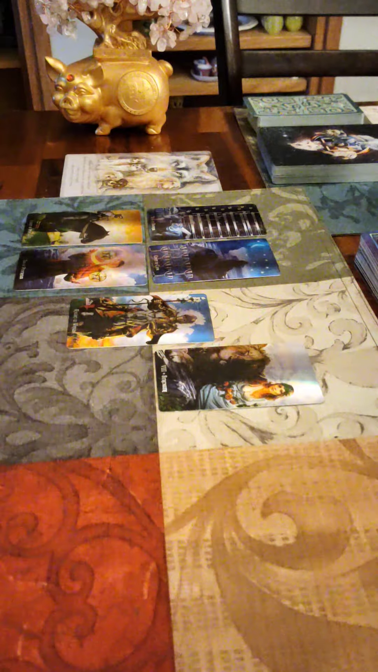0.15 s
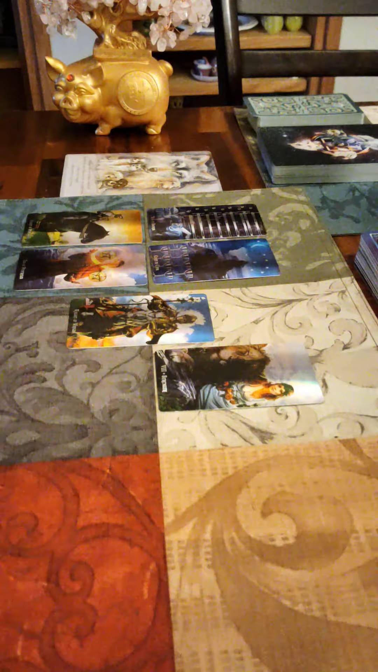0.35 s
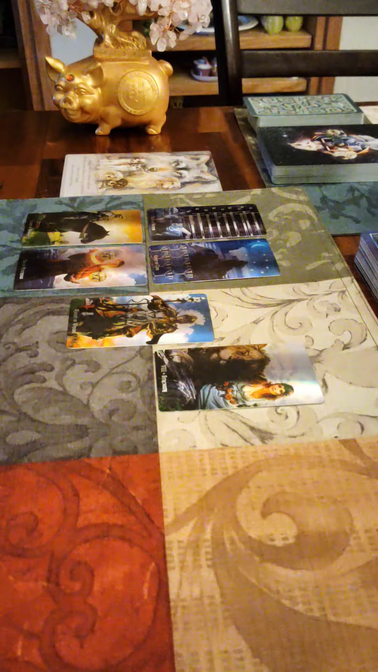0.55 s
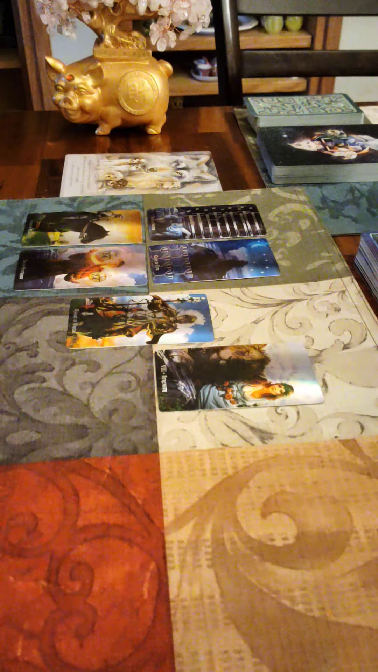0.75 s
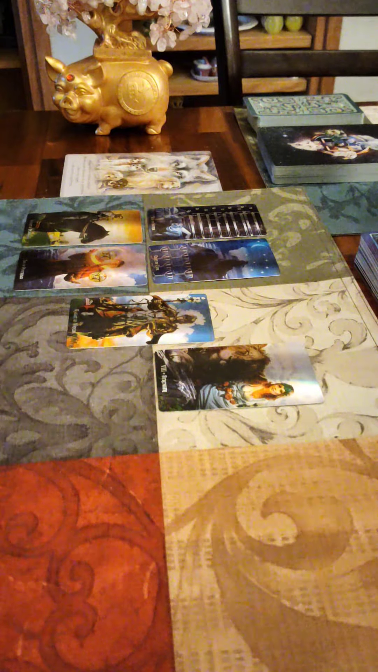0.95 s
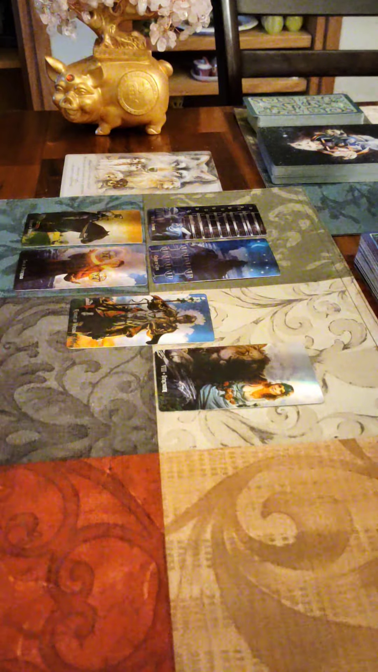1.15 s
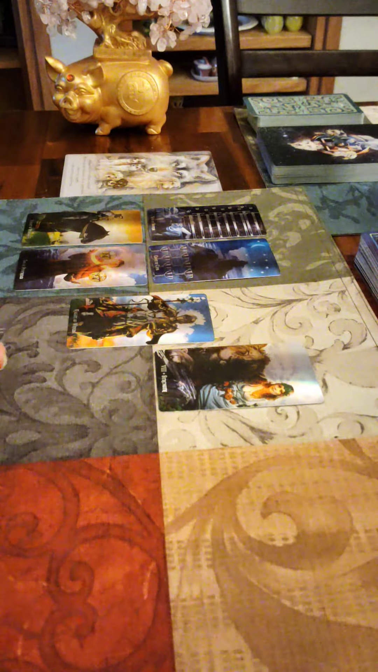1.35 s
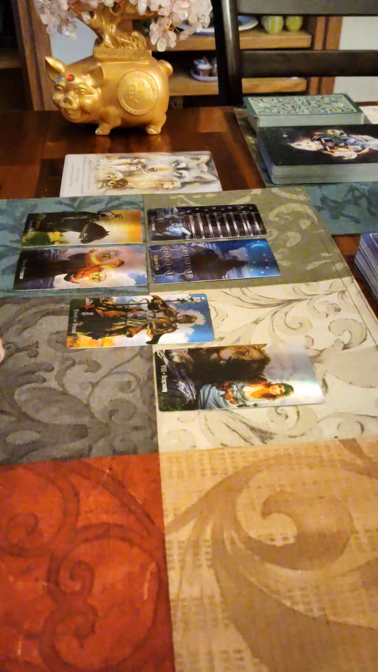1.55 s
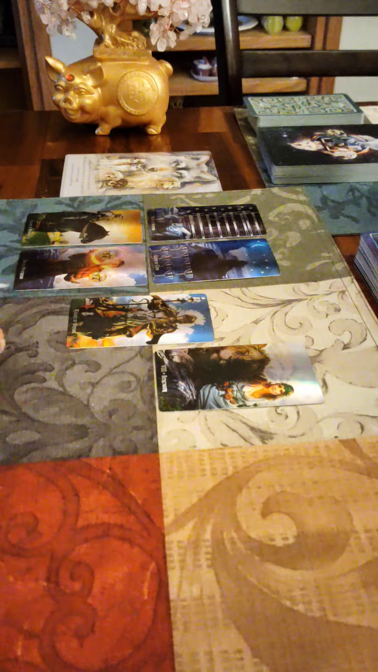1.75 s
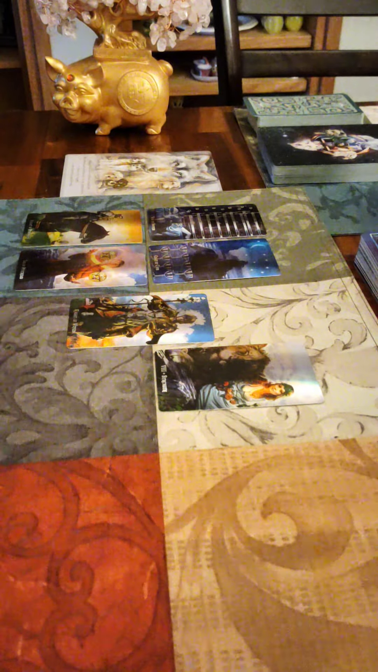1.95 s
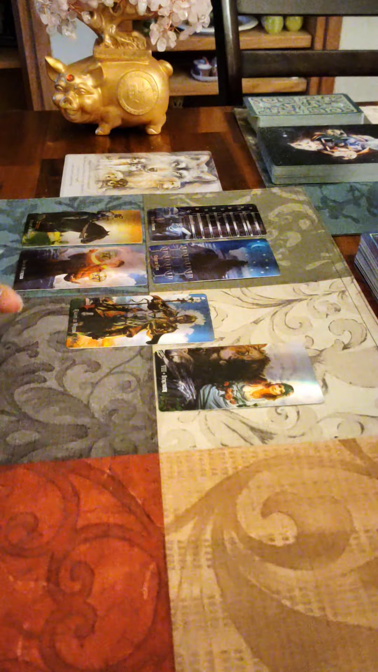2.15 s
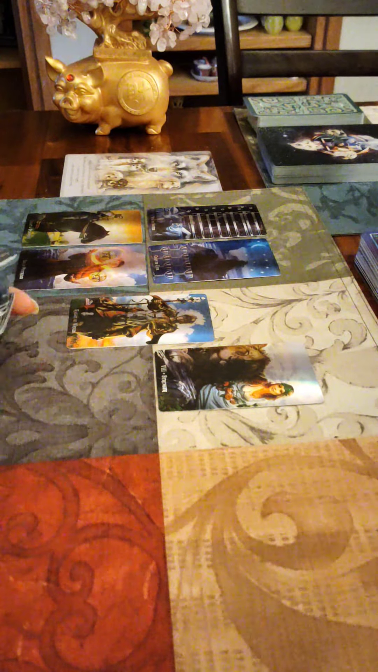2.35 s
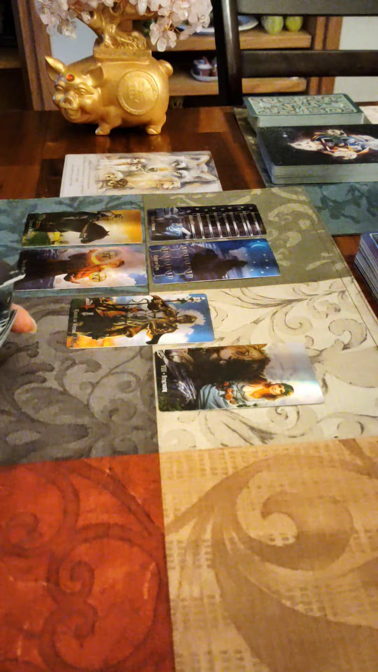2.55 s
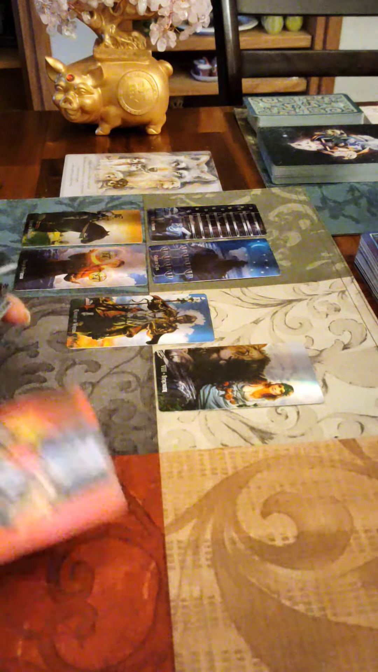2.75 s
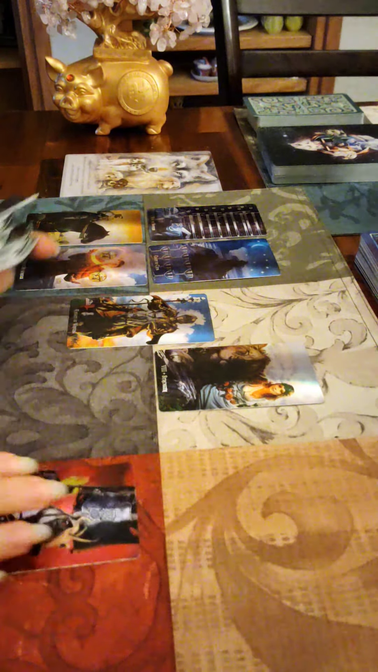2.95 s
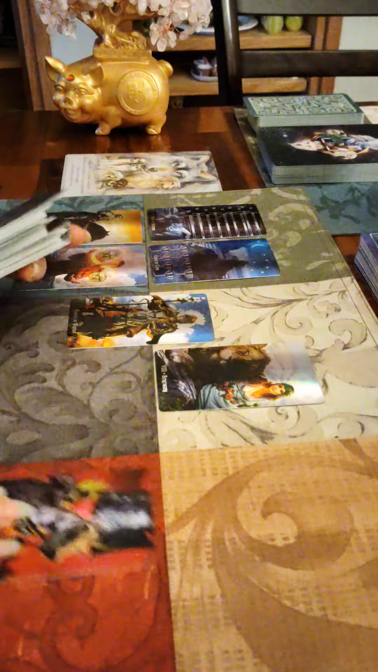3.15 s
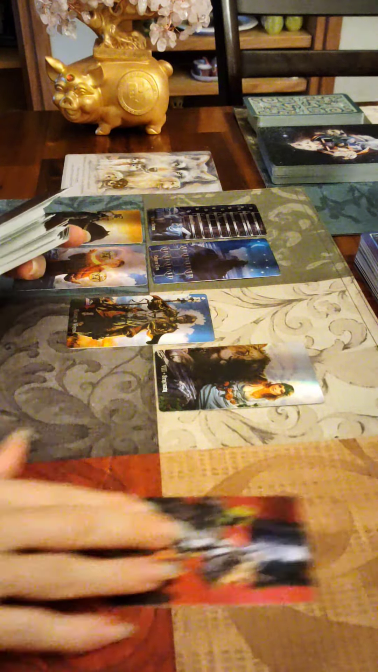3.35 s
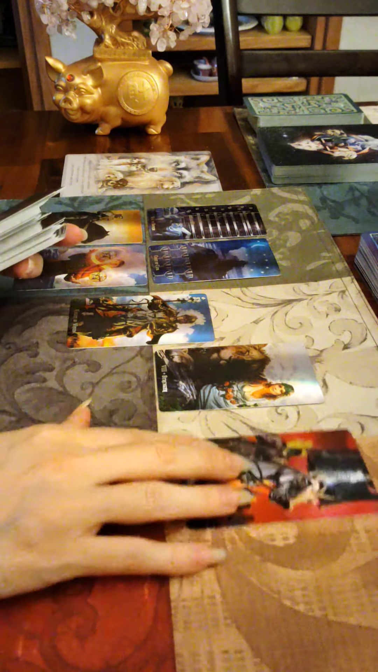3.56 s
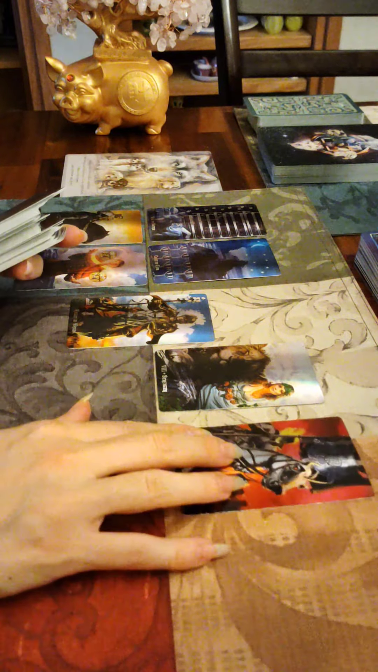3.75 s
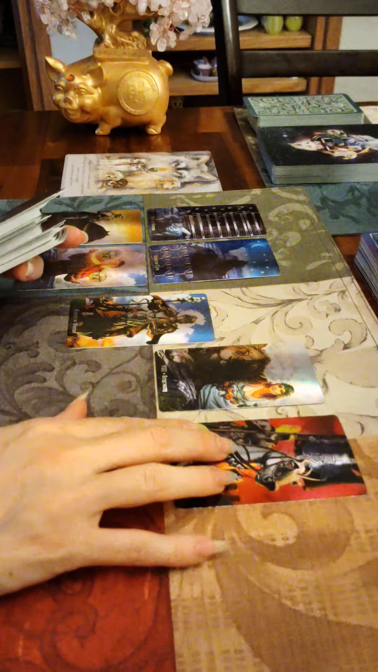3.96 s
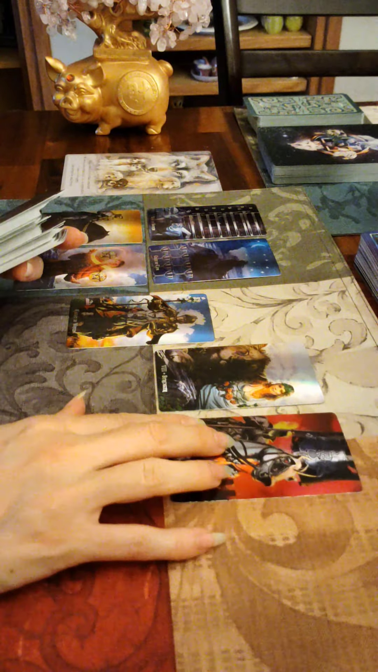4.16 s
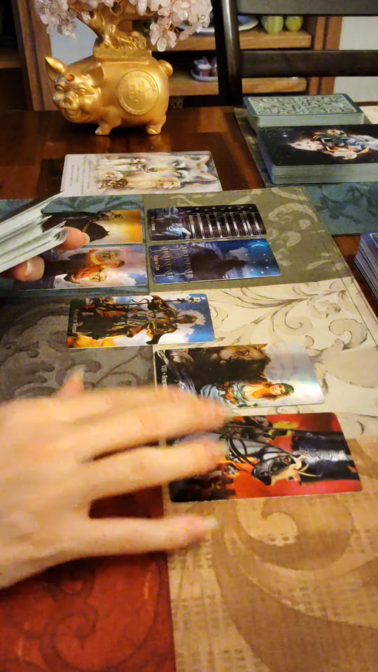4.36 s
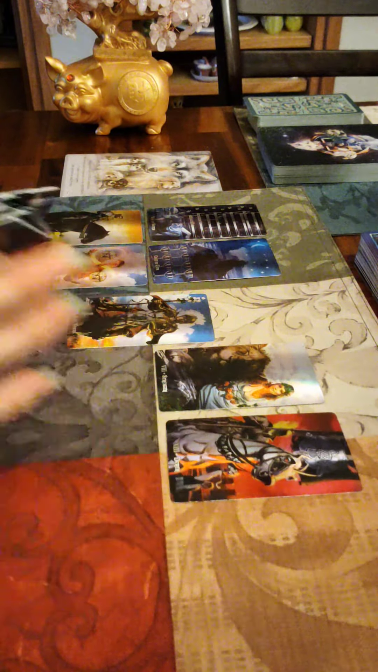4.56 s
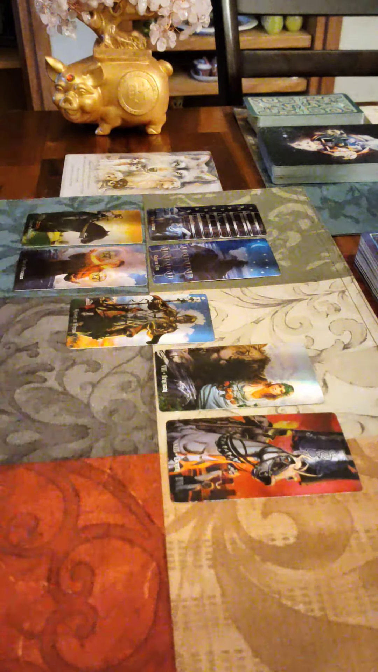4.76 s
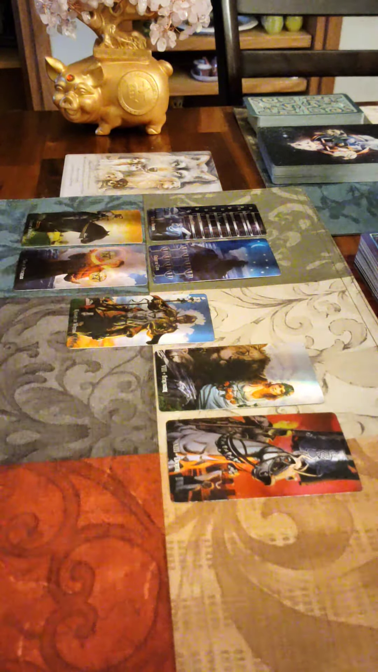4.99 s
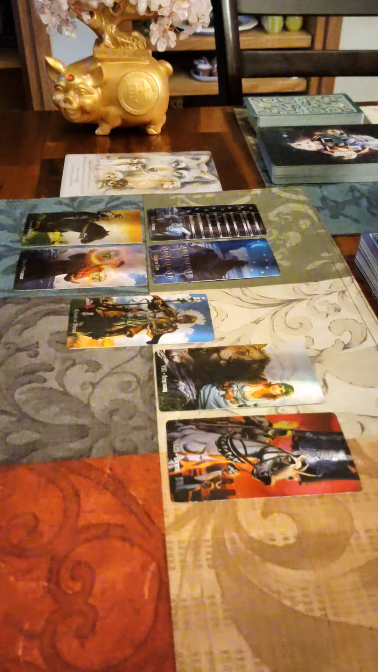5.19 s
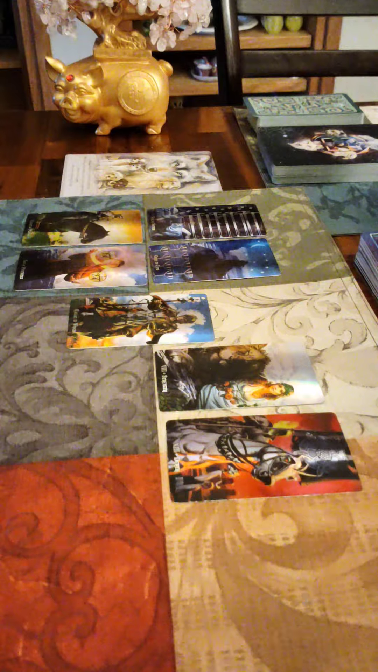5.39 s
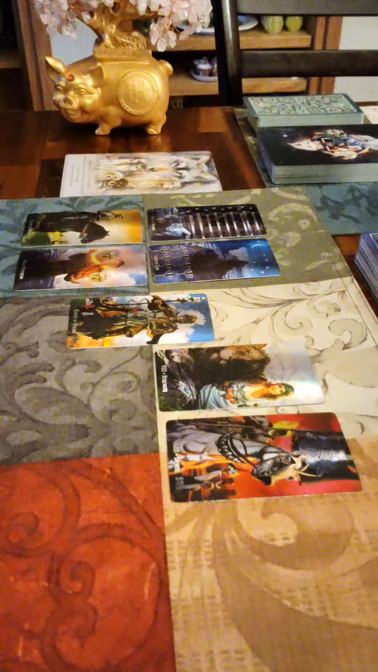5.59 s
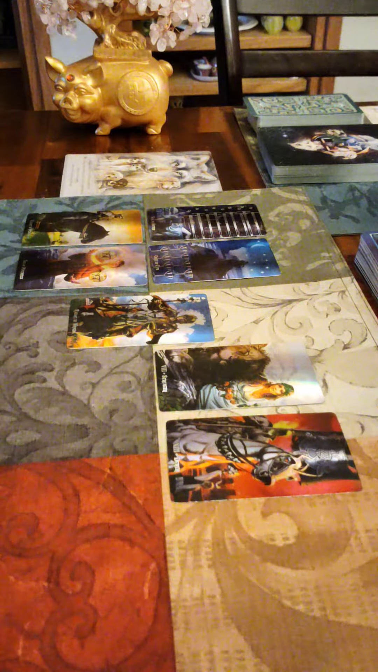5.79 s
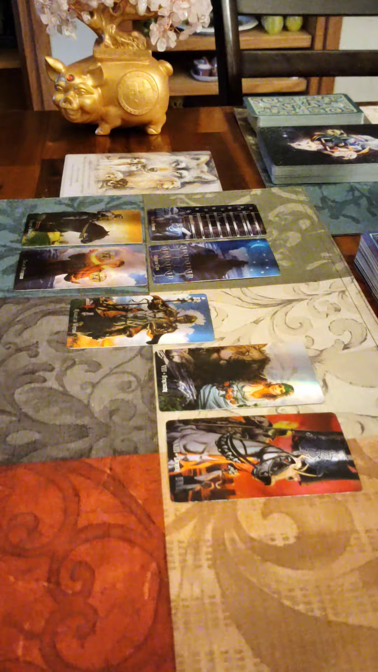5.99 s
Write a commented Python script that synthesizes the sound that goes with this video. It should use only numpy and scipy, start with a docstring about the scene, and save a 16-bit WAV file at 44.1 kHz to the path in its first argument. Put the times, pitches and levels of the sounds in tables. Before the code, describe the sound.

A faint low room hum stays underneath while cards are handled near a phone microphone. Gentle papery rubbing gives way to small irregular clicks and light taps, then a stronger peel, a bright cluster of snaps with a soft hand thud on the table, and a dry slide across cloth. Afterwards only quiet scuffs and a few ticks remain until a closing crisp flick. The small room adds a short diffuse tail.

```python
"""A soft rub of card over a low room hum comes first; then cards are peeled, flicked and slid over a table cloth.
Rubs are grainy noise through three bands of card resonances; edges snap as short decaying noise that rings them.
Dull knocks and thuds ring the table top, a small room answers with a short diffuse tail, and a faint rustle
and slowly swelling drones stay underneath. A phone close by dulls the extreme top; both channels are the same."""
import sys
import numpy as np
from scipy import signal
from scipy.fft import rfft, irfft
from scipy.io import wavfile
from scipy.ndimage import uniform_filter1d

SR = 44100
rng = np.random.default_rng(int(sys.argv[2]) if len(sys.argv) > 2 else 0)


def int16_out(signal):
    """Quantize to a 16-bit WAV file."""
    q = np.round(np.clip(np.atleast_2d(signal).T, -1, 1) * 32767)
    wavfile.write(sys.argv[1], SR, q.astype(np.int16))


N = 265923  # samples, about 6 s


def undb(db):
    """Turn decibels into an amplitude factor."""
    return 10 ** (np.asarray(db) / 20)


def unit(x):
    """Scale to an RMS of 1."""
    return x / np.sqrt(np.mean(x ** 2))


def above(x, hz):
    """Steep high-pass."""
    return signal.sosfilt(signal.butter(6, hz, "high", fs=SR, output="sos"), x)


def resonate(x, modes):
    """Sum of parallel resonances, each (frequency [Hz], width [Hz], weight [dB])."""
    out = 0
    for hz, width, db in modes:
        out = out + undb(db) * signal.lfilter(*signal.iirpeak(hz, hz / width, fs=SR), x)
    return out


def ring(x, modes):
    """Resonances scaled so that white noise keeps its level."""
    answer = resonate(signal.unit_impulse(4096), modes)
    return resonate(x, modes) / np.sqrt(np.sum(answer ** 2))


def near(modes, hz, fall_db):
    """The spot that is struck favours the modes close to hz: fall_db less for each octave away."""
    return [(f, width, db - fall_db * abs(np.log2(f / hz))) for f, width, db in modes]


def flicker(rate):
    """Random levels, one every 1 / rate s, joined by straight slides; RMS of 1."""
    hold = int(SR / rate)
    steps = np.repeat(rng.standard_normal(N // hold + 1), hold)
    return unit(uniform_filter1d(steps, hold)[:N])


def bursts(rows, decay_s, push_s, size):
    """For each (s, peak dB, modes) a decaying spit of noise, softened over the push time, rings the modes."""
    out = np.zeros(N + size)
    decay = np.exp(-np.arange(size) / SR / decay_s)
    push = np.hanning(3 + int(push_s * SR))
    for s, db, modes in rows:
        spit = rng.standard_normal(size) * decay
        blow = resonate(np.convolve(spit, push)[:size], modes)
        start = int(s * SR)
        out[start:start + size] += undb(db) * blow / np.abs(blow).max()
    return out[:N]


def card(hiss, body, low):
    """Sum a card's three bands, keeping the upper two silent below their floors."""
    return above(hiss, 4500) + above(body, 3000) + low


# colour of the room noise: (frequency [Hz], relative level [dB])
HUM_COLOUR = [(10, -8), (22, 5), (89, -6), (190, -16.5), (387, -12.5), (693, -21), (790, -17.5),
              (1300, -22), (2590, -27.5), (4600, -25), (6500, -18.5), (7600, -27.5), (8600, -61.5)]
# room resonances in the hum: (frequency [Hz], width [Hz], level about which it swells [dB])
ROOM_DRONES = [(27, 14.3, -59), (89.5, 6.7, -60.5), (154.4, 32, -70.5), (241, 16, -68.5), (382, 11.4, -66)]


def hum(level_db=-51.5, swell_db=2.5, swell_hz=2.55):
    """Steady coloured room noise with a few narrow low bands whose levels swell at random."""
    f = np.arange(1, N // 2 + 2) * SR / N
    colour_hz, colour_db = np.transpose(HUM_COLOUR)
    shape = undb(np.interp(np.log(f), np.log(colour_hz), colour_db))
    out = undb(level_db) * unit(irfft(rfft(rng.standard_normal(N)) * shape, N))
    for hz, width, db in ROOM_DRONES:
        swell = undb(db + swell_db * flicker(swell_hz))
        out += swell * ring(rng.standard_normal(N), [(hz, width, 0)])
    return out


def room(x, level_db=-5, t60_s=0.27, gap_s=0.005):
    """Diffuse echoes fade in over a short gap and die away by 60 dB in t60_s."""
    t = np.arange(SR // 2) / SR
    decay = np.exp(-np.log(1000) * t / t60_s)
    tail = rng.standard_normal(len(t)) * decay * np.clip(t / gap_s, 0, 1)
    tail = undb(level_db) * tail / np.sqrt(np.sum(tail ** 2))
    return signal.fftconvolve(x, tail)[:N]


# card or finger meets the table: (time [s], peak level [dB], favoured ring [Hz])
TABLE_TAPS = [(1.26, -29.5, 1260), (1.281, -45, 1450), (1.67, -42.5, 1250), (2.4, -47.5, 1410),
              (2.618, -43.5, 604), (2.637, -43.5, 514), (2.645, -32, 1520), (2.915, -40, 447),
              (2.941, -33, 1160), (2.949, -32, 1750), (2.968, -39, 1700), (2.987, -45.5, 1600),
              (3.229, -41, 1300), (3.585, -39, 1300), (3.588, -45, 477), (3.594, -36, 1100),
              (3.604, -42.5, 1100), (3.612, -44, 500), (3.632, -44, 1400)]
# the weight of the hand lands on the table: (time [s], peak level [dB])
HAND_THUDS = [(2.915, -38.5), (2.941, -37), (2.962, -33), (3.586, -49)]
# table top resonances, upper and deep: (frequency [Hz], width [Hz], weight [dB])
TABLE_TOP_MODES = [(444, 51, 9), (610, 150, 0), (1160, 160, -19), (1363, 200, -6.5), (1630, 150, 1.5)]
TABLE_DEEP_MODES = [(99, 20, -4), (144, 26, 3), (185, 40, -7)]


def knocks(touch_s=0.0032):
    """Soft blows ring the table top; the weight of the hand is a slower push into its deep modes."""
    top = [(s, db, near(TABLE_TOP_MODES, hz, fall_db=31)) for s, db, hz in TABLE_TAPS]
    deep = [(s, db, TABLE_DEEP_MODES) for s, db in HAND_THUDS]
    taps = bursts(top, touch_s, push_s=0.00074, size=1024)
    thuds = bursts(deep, touch_s, push_s=0.0049, size=4096)
    return taps + thuds


# an edge lets go or strikes:
# (time [s], crack peak before its high-pass [dB], favoured ring [Hz], card body re crack [dB])
EDGE_SNAPS = [(0.8545, -30, 6700, -12), (0.8614, -29, 6970, -22), (0.8668, -24, 6700, -20),
              (0.915, -28, 7500, -22), (0.9438, -26, 7000, -24), (1.2685, -28, 7000, -6),
              (1.283, -31, 6420, -10), (1.295, -31, 6720, -13), (1.301, -32, 6560, -16),
              (1.6736, -34, 6380, -13), (1.6884, -28, 6140, -19), (1.713, -25, 5440, -16),
              (1.7258, -30, 5470, -17), (2.15, -37, 6590, -21), (2.3261, -29, 5360, -20),
              (2.4295, -33, 6100, -24), (2.639, -27, 6500, -5), (2.6454, -17.5, 6540, -11),
              (2.648, -19, 6320, -20), (2.6724, -26, 6500, -20), (2.656, -26, 6130, -18),
              (2.6594, -22.5, 6370, -24), (2.9244, -30, 6520, -24), (2.9318, -17, 6860, -11),
              (2.9451, -18, 6320, -15), (2.9508, -15, 6300, -0.5), (2.9699, -9, 6360, -8),
              (2.9804, -19.5, 6780, -13.5), (3.2295, -23, 5170, -15), (3.236, -16, 6490, -6),
              (3.239, -17, 6450, -16), (3.2415, -20.5, 6480, -16), (3.2448, -7.5, 6280, -25),
              (3.2534, -22.5, 6850, -18), (3.6766, -25.5, 6000, -25), (3.9, -38, 6640, -18),
              (4.88, -36, 6000, -18), (4.91, -31, 5660, -23), (4.995, -35, 6200, -10),
              (5.995, -27, 6420, -18), (6.0214, -20, 6450, -21)]
# card resonances in three bands, shared by snaps and rubs: (frequency [Hz], width [Hz], weight [dB])
HISS_MODES = [(5400, 410, 5.5), (6065, 270, 12.5), (6600, 260, 15), (6480, 270, -7), (6940, 480, -28.5)]
BODY_MODES = [(3070, 550, 0), (3520, 570, -2), (4050, 760, 4), (4770, 830, 4)]
LOW_MODES = [(554, 150, 4.5), (1110, 270, -3.5), (1460, 320, -5.5), (1920, 540, -6.5), (2450, 250, -2.5)]


def snaps(crack_s=0.0012, low_db=-26.5):
    """Millisecond cracks ring the card's edge, body and low modes."""
    edge = [(s, db, near(HISS_MODES, hz, fall_db=44)) for s, db, hz, _ in EDGE_SNAPS]
    body = [(s, db + body_db, BODY_MODES) for s, db, _, body_db in EDGE_SNAPS]
    low = [(s, db + low_db, LOW_MODES) for s, db, _, _ in EDGE_SNAPS]
    return card(*(bursts(rows, crack_s, push_s=0, size=512) for rows in (edge, body, low)))


def stroke(grain, grit, s, db, body_db, low_db, body_hz, grain_db):
    """One movement, noise whose hiss follows db at the times s: its span and its three bands."""
    span = slice(int(s[0] * SR), min(int(s[-1] * SR), N))
    t = np.arange(span.start, span.stop) / SR
    force = undb(np.interp(t, s, db)) * unit(undb(grain_db * grain[span]))
    force = force * np.clip(np.minimum(t - s[0], s[-1] - t) / 0.002, 0, 1)  # 2 ms soft ends
    # band level [dB], modes, favoured frequency [Hz]
    colours = [(0, HISS_MODES, 6400), (body_db, BODY_MODES, body_hz), (low_db, LOW_MODES, 1530)]
    bands = []
    for noise, (re_db, modes, hz) in zip(grit, colours):
        bands.append(undb(re_db) * ring(force * noise[span], near(modes, hz, fall_db=8.5)))
    return span, bands


# card rubbing on card or cloth, one row a movement: (start [s], rise [s], hold [s], fall [s],
# hiss at full level [dB], card body re hiss [dB], low scuff re hiss [dB], favoured body ring [Hz])
CARD_RUBS = [(0.0, 0.021, .02, 0.13, -50.5, -7, -22, 4300), (0.08, .06, 0.23, .1, -60.5, -8.5, -20, 4300),
             (0.433, 0.033, .01, .04, -57, -1.5, -18, 4300), (0.803, 0.028, .015, .03, -48, -15, -13, 4300),
             (0.848, 0.0064, .025, .03, -42.5, -5.5, -12.5, 4300),
             (0.89, 0.021, 0.016, 0.056, -46, -7, -18, 4300),
             (0.937, .003, 0.003, 0.043, -36.5, -13, -19, 5100),
             (1.258, 0.0035, 0.039, 0.035, -41.5, -5, -11, 3400),
             (1.313, .02, .03, 0.099, -54.5, -10, -14, 4300),
             (1.552, .012, .005, 0.036, -58, -6, -18, 4300),
             (1.658, 0.0075, 0.069, 0.049, -43, -3.5, -13, 4200),
             (1.796, 0.018, 0.021, .04, -53, 0, -10, 4740), (1.936, 0.064, .02, .12, -55, -6.5, -14, 4300),
             (2.138, 0.0081, .005, 0.075, -59, -9, -16, 4300),
             (2.311, .01, 0.023, 0.044, -55, -8, -14, 4700),
             (2.373, .05, .005, 0.058, -46.5, -9, -14, 3300),
             (2.621, 0.021, 0.0076, 0.031, -34.5, -5, -6.5, 3100),
             (2.64, .008, .015, .04, -40, -3.5, -12.5, 3100),
             (2.776, .07, 0.061, 0.032, -58.5, -3.5, -18, 4300),
             (2.888, .015, 0.023, .02, -56, 6, -13, 4700), (2.921, 0.0059, 0.033, .03, -41, -2.5, -3, 3900),
             (2.936, 0.027, 0.013, 0.05, -32, 3, -10.5, 4200),
             (3.226, 0.011, 0.013, 0.032, -33.5, 5, -16.5, 4300),
             (3.576, .006, .04, .05, -55.5, -3, 5.5, 4300), (3.664, .013, .008, .07, -41, -3, -13, 4300),
             (3.839, .016, 0.036, .16, -52.5, -7.5, -20, 4700),
             (4.07, 0.082, 0.011, 0.066, -53, -6.5, -16, 4300),
             (4.267, 0.18, 0.15, .08, -59, -11, -20, 4300), (4.803, 0.023, 0.026, .05, -54, -8, -16, 4700),
             (4.849, .052, 0.0045, 0.11, -46.5, -5, -12, 4700),
             (4.982, .003, 0.017, 0.082, -49, -4, -10, 3600),
             (5.065, 0.092, .02, 0.15, -53, -12, -16, 4000),
             (5.615, 0.059, 0.0093, 0.075, -57, -8, -1.5, 3600),
             (5.977, 0.014, 0.019, 0.037, -42.5, -2.5, -10.5, 4700),
             (5.988, 0.039, .03, .03, -34.5, -5, -17, 4500)]
# one card pushed a long way over the cloth: (time [s], hiss level [dB])
LONG_SLIDE = [(3.25, -56), (3.3, -38.5), (3.372, -40.5), (3.464, -36.5), (3.52, -38), (3.578, -40.5),
              (3.666, -41.5), (3.72, -50.5), (3.78, -65)]
FADE_DB = 22  # how far below its full level a movement starts and ends
GRAIN_DB, GRAIN_PER_DB, GENTLE_DB = 1.4, 0.08, -51  # grains grow more uneven above the gentle level


def rubs():
    """Fibres catch and slip: noise of uneven grains that rises, holds and fades with each movement."""
    grain, grit = flicker(400), rng.standard_normal((3, N))
    # each move: times [s], hiss [dB], body and low re hiss [dB], body ring [Hz], grain spread [dB]
    rustle_db = -67 + 4 * flicker(9)  # hands never quite rest on the deck
    rustle = (np.arange(N) / SR, rustle_db, -3.5, -19.5, 4300, GRAIN_DB)
    slide = (*np.transpose(LONG_SLIDE), -8.5, -26.5, 4380, 1.1)
    moves = [rustle, slide]
    for start, rise, hold, fall, db, *colour in CARD_RUBS:
        times = start + np.cumsum([0, rise, hold, fall])
        levels = db - FADE_DB * np.array([1, 0, 0, 1])
        grain_db = GRAIN_DB + GRAIN_PER_DB * max(db - GENTLE_DB, 0)
        moves.append((times, levels, *colour, grain_db))
    out = np.zeros((3, N))
    for k, move in enumerate(moves):
        own_grit = np.roll(grit, 997 * k, axis=1)  # so that overlapping moves differ
        span, bands = stroke(grain, own_grit, *move)
        out[:, span] += bands
    return card(*out)


def scene():
    """Cards and table with their room answer over the hum, alike in both channels."""
    cards = rubs() + snaps() + knocks()
    return np.tile(cards + room(cards) + hum(), (2, 1))


def record(dry):
    """The phone steps the treble down above 7600 Hz, then cuts steeply above 8500 Hz."""
    soft = signal.sosfilt(signal.ellip(4, 1, 24, 7600, fs=SR, output="sos"), dry)
    return signal.sosfilt(signal.ellip(10, 0.5, 45, 8500, fs=SR, output="sos"), soft)


dry = scene()
out = record(dry)
int16_out(out)
```